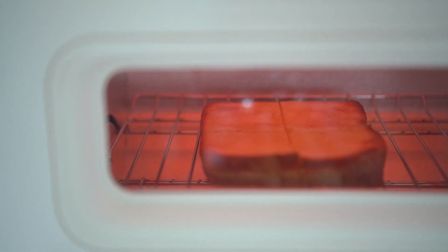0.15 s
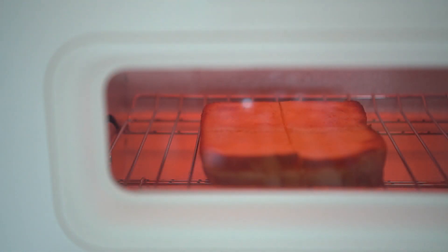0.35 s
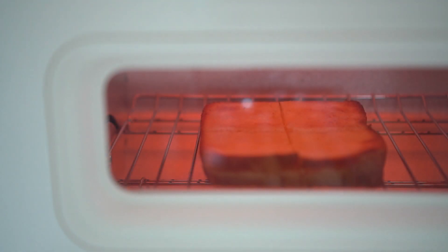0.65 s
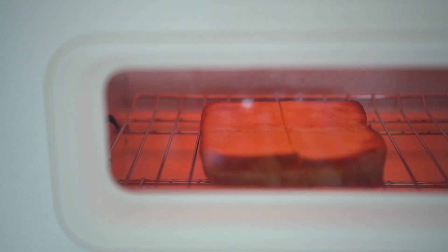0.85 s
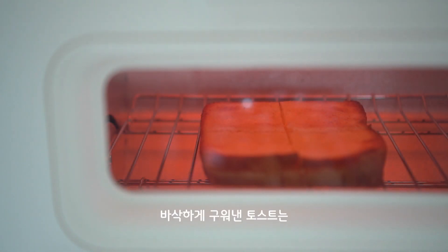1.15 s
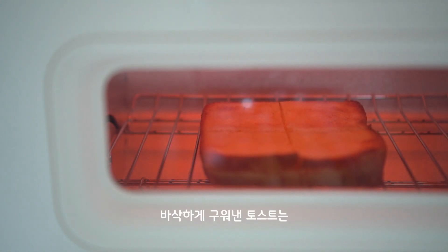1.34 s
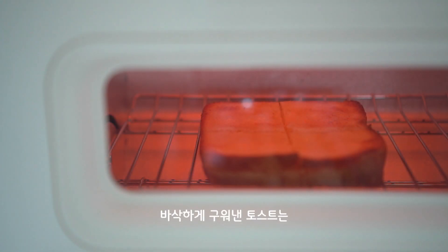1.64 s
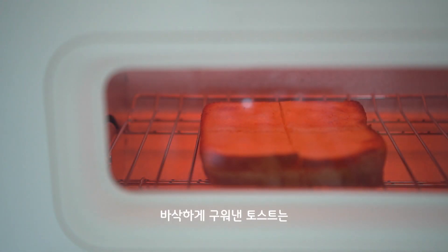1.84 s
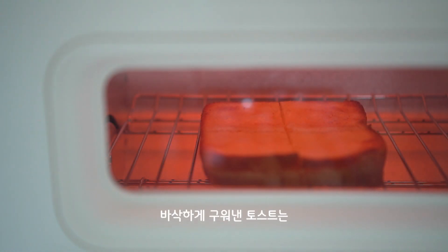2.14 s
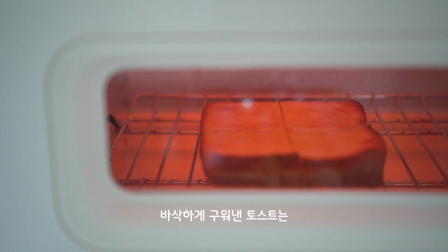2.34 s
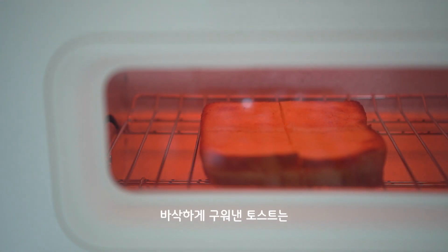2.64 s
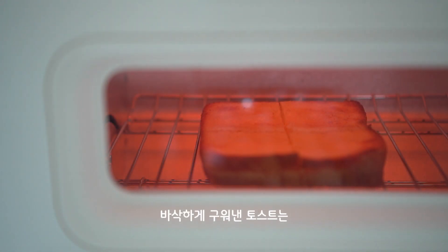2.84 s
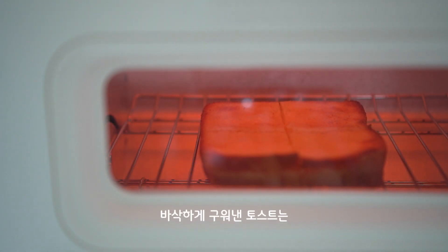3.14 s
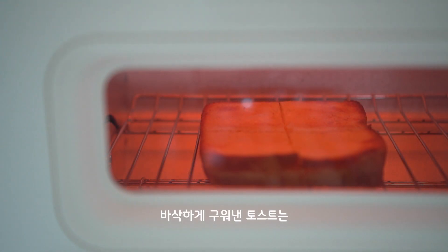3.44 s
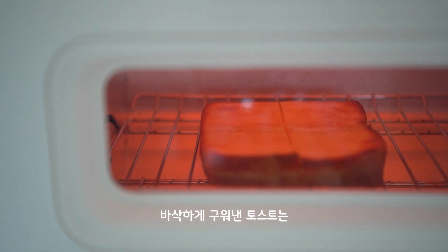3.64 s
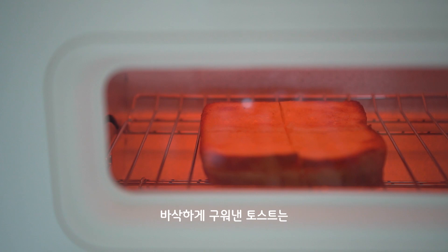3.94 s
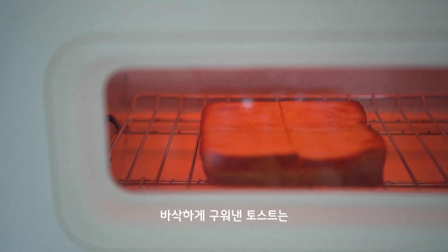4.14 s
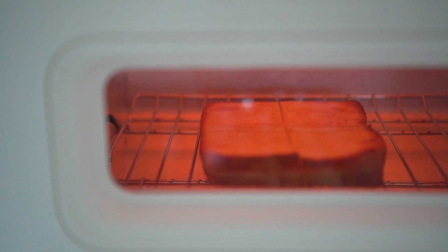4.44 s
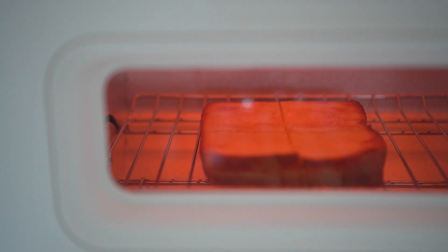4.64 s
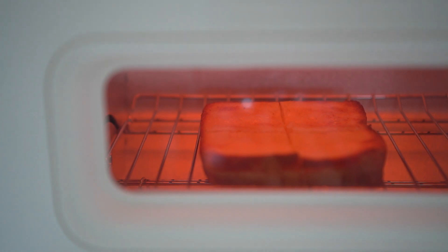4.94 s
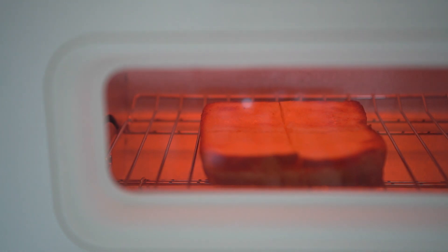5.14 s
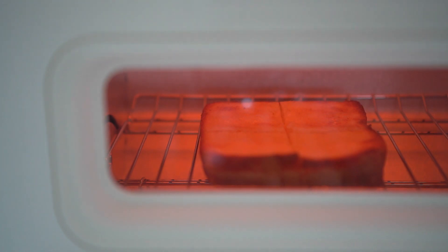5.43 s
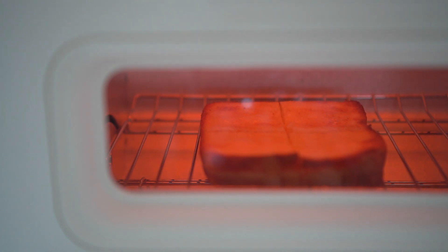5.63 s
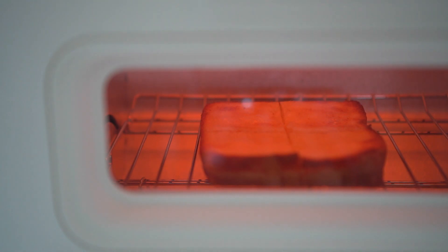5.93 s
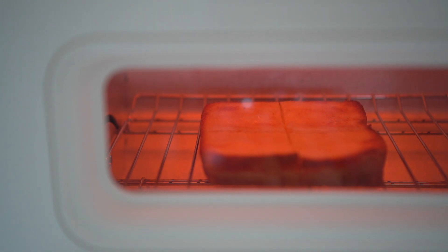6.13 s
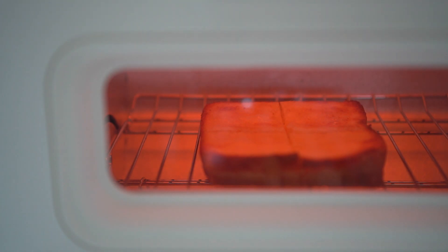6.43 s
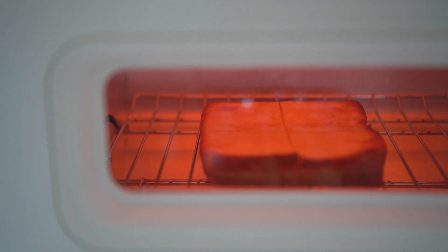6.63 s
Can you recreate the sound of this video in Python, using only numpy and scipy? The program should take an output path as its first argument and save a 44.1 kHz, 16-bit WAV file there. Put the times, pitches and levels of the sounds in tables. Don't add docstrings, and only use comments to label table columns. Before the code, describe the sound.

Bread toasts in a small oven in a quiet kitchen. Steady, dry, high-pitched timer ticks dominate from the right of a close stereo microphone. The heated shell answers slightly to the left: a pair of muted knocks, a bright rattling snap, a low knock, a duller tinny snap, then isolated knocks. Soft fan air stays far behind, and a faint floor thud comes near the end.

```python
import sys
import numpy as np
from scipy import signal
from scipy.fft import rfft, irfft, next_fast_len
from scipy.io import wavfile
from scipy.ndimage import uniform_filter1d

SR = 44100
rng = np.random.default_rng(int(sys.argv[2]) if len(sys.argv) > 2 else 0)


def file_out(sig):
    cols = np.atleast_2d(sig).T
    lim = np.clip(cols, -1, 1)
    pcm = np.round(lim * 32767).astype(np.int16)
    wavfile.write(sys.argv[1], SR, pcm)


def decibels_to_gain(level_db):
    exponent = np.asarray(level_db, float) / 20
    return 10 ** exponent


N = 298998

# (time [s], strength [dB])
TICKS = [(0.44898, 0.0), (0.9495, 0.2), (1.45002, -0.3), (1.9483, -1.5), (2.44878, 0.2), (2.94977, -0.8),
         (3.44914, -0.0), (3.94841, -0.3), (4.44986, 0.1), (4.94921, 0.3), (5.44848, -0.2), (5.94993, -0.3),
         (6.44927, 0.2)]
# (pitch [Hz], signed strength [ratio], time to fade by 60 dB [s])
CASE_TONES = [(4696, -.9, .004929), (4663, 1, .004241), (3812, -.076, .009778), (5215, -.008, .025)]
# (pitch [Hz], left level [dB], right level [dB], fade by 60 dB [s])
CASE_OVERTONES = [(5100, -42, -52, 0.031), (5400, -52, -48, .015), (6300, -54, -54, 0.0043),
                  (7860, -67, -47.5, 0.017), (8400, -57, -50.5, 0.022), (10050, -66, -47.5, 0.019),
                  (11000, -52.5, -58, 0.034)]
# (delay [s], level [dB])
LEFT_LEAK = (.00005, -17)
# (delay [s], level [dB])
LEFT_PATHS = [(.00029, -9.5), (.0006, -20), (.00128, -12.9), (.00224, -17.3), (.00396, -18.5),
              (.00621, -19)]
# (delay [s], level [dB])
RIGHT_PATHS = [(.00001, 0), (.00202, -17.9), (.0029, -15.8), (.00369, -18.4), (.00445, -13.3),
               (.00623, -17), (.007, -15.3)]
# (time [s], peak [dB], left-right [dB], chatter length [s], rattle level [dB])
SNAPS = [
    (2.8768, -22, -5, 0.01, 2.5),
    (3.8484, -20.5, -4.5, 0.016, 1),
]
# (pitch [Hz], level [dB], fade by 60 dB [s], swell [s])
PANEL_TONES = [(602, -9, 0.17, 0.013), (874, -7.5, 0.13, 0.012), (1767, -7.5, 0.11, 0.0071),
               (2250, -10, 0.07, 0.0033), (2360, -10, 0.095, 0.0073), (2560, 4.5, 0.084, 0.0056),
               (3260, -14, 0.1, .004), (3825, -0.5, 0.071, 0.0019), (4730, -11, 0.048, 0.0018),
               (5460, -10, 0.037, 0.00092), (6310, -3.5, 0.042, 0.00081), (9700, -8, 0.045, .002),
               (13370, -3, .025, .001)]
# (pitch [Hz], level [dB], fade by 60 dB [s], swell [s])
TRAY_TONES = [(214, -16.5, 0.28, 0.0043), (769, -1.5, 0.21, 0.0089), (1234, -7, 0.1, 0.0029),
              (1457, -19, 0.15, 0.0047), (1800, -19, 0.21, 0.0051), (2400, -6, 0.072, 0.0022),
              (2550, -10, 0.18, 0.0087), (3900, -7, 0.062, 0.0037), (4940, -21, .07, .006),
              (6630, -16, .05, .004), (8930, -13, 0.034, .001), (12600, -7, 0.013, .001)]
# (frequency [Hz], level [dB per Hz])
PANEL_RATTLE = [(300, -32), (700, -18), (1100, -16), (1800, 2.5), (2600, -13), (3800, -10), (6000, -3.5),
                (9500, -4), (13500, -7), (16000, -12)]
# (frequency [Hz], level [dB per Hz])
TRAY_RATTLE = [(150, -28), (450, -13), (800, -2), (1400, -1.5), (2500, -6), (4000, -7), (8000, -14.5),
               (12600, -19), (16000, -24)]
# (time [s], peak [dB], left-right [dB], main pitch [Hz], cluster level [dB])
KNOCKS = [
    (2.0159, -36, -3, 730, -16.5),
    (2.0873, -35.5, -2, 790, -16.5),
    (3.194, -33.5, -1.5, 680, -17),
    (4.448, -32.5, -3, 688, -13.5),
    (5.9732, -30, -3, 725, -12),
]
# (frequency [Hz], level [dB per Hz])
KNOCK_BODY = [(120, -27), (300, -12), (450, -5.5), (750, 0), (1050, -2), (1450, -12), (2350, -12.5),
              (3200, -24), (6000, -37)]
# (frequency [Hz], fade by 60 dB [s])
KITCHEN_FADE = [(200, 0.36), (1000, 0.47), (4000, 0.39), (12000, 0.15)]
# (time [s], level [dB])
THUD = (6.325, -50)
# (pitch [Hz], level [dB], fade by 60 dB [s])
FLOOR_TONES = [(76, -14, .3), (111.6, -11, .3), (276, 4, 0.2), (660, -1, 0.11)]
# (frequency [Hz], level [dB per Hz])
AIR_COLOUR = [(25, -48), (50, -48), (90, -24), (130, -16.5), (200, -12.5), (290, -7), (800, -7.5),
              (1130, -4.5), (2100, -12), (3000, -12), (3700, -16), (8000, -20.5), (13000, -23),
              (16000, -24.5)]
# (frequency [Hz], likeness [-1 to 1])
AIR_LIKENESS = [(60, 1), (270, 0.85), (450, 0.58), (740, 0.1), (1220, 0.54), (2010, -0.32), (3330, 0.23),
                (15000, .25)]
# (frequency [Hz], left over right [dB])
AIR_LEAN = [(60, 0), (380, 1), (700, 0), (1290, 3.5), (2380, -1.5), (4400, -2.5), (15000, -2.7)]
# (frequency [Hz], width [Hz], boost [dB])
DUCT = [(278, 7.4, 7), (376, 4.4, 12), (665, 10.5, 7), (977, 44, 3.5), (1124, 30, 5), (1160, 115, 3.5),
        (1418, 36, 6), (2934, 94, 4.5)]
# (pitch [Hz], level [dB])
HUM_TONES = [(59.02, -93), (59.384, -95)]


def unit(x):
    return x / np.sqrt(np.mean(x ** 2) + 1e-20)


def along(points, hz):
    f, v = np.transpose(points)
    return np.interp(np.log(hz + 1), np.log(f + 1), v)


def filtered(x, response):
    size = next_fast_len(x.shape[-1] + 8192)
    spectrum = rfft(x, size) * response(np.fft.rfftfreq(size, 1 / SR))
    return irfft(spectrum, size)[..., :x.shape[-1]]


def ring(t, hz, db, t60):
    return decibels_to_gain(db - 60 * t / t60) * np.sin(2 * np.pi * hz * t)


def swelling(t, swell_s):
    return 1 - np.exp(-(t / swell_s) ** 2)


def add(out, s, x):
    k = round(s * SR)
    part = out[:, max(k, 0):][:, :x.shape[-1] + min(k, 0)]
    part += x[:, max(-k, 0):][:, :part.shape[-1]]


def placed(x, pan_db, wet_db, gap):
    hz, t, z = signal.stft(rng.standard_normal((2, SR // 2)), SR, nperseg=128)
    fade = decibels_to_gain(-60 * t / along(KITCHEN_FADE, hz)[:, None])
    tail = signal.istft(z * fade, SR, nperseg=128)[1][:, :SR // 2]
    u = np.arange(SR // 2) / SR
    tail = tail * swelling(u, gap) * (1 + 0.44 * np.exp(-u / 0.013))
    tail = tail / np.linalg.norm(tail[0])
    wet = signal.fftconvolve(x, tail, axes=1)[:, :x.shape[-1]]
    direct = x * decibels_to_gain(np.array([[pan_db / 2], [-pan_db / 2]]))
    return direct + decibels_to_gain(wet_db) * wet


def clutter(count):
    start_s, step_s = 0.008, 0.0025
    level_db, fade_db_per_s = -24.5, -60
    chance = rng.random((count, 2))
    delay = start_s + step_s * (np.arange(count) + chance[:, 0])
    level = level_db + fade_db_per_s * delay + 3 * (chance[:, 1] - .5)
    return list(zip(delay, level))


def case_click(t):
    return sum(gain * ring(np.maximum(t, 0), hz, 0, t60) for hz, gain, t60 in CASE_TONES)


def timer():
    t = np.arange(SR // 2) / SR
    left = [LEFT_LEAK, *LEFT_PATHS, *clutter(count=5)]
    right = [*RIGHT_PATHS, *clutter(count=5)]
    tick = np.array([sum(decibels_to_gain(db) * case_click(t - delay) for delay, db in paths) for paths in (left, right)])
    overtones = sum(ring(t, hz, np.array([[left_db], [right_db]]), t60)
                    for hz, left_db, right_db, t60 in CASE_OVERTONES)
    tick = tick + overtones * (1 - np.exp(-t / 0.00044))
    toward_walls = (case_click(t) + ring(t, 5050, -28, .007) + ring(t, 3812, -27, .0098))[None]
    tick = tick + placed(toward_walls, 0, -11, gap=.009) - toward_walls
    edge_hz = np.array([[3550], [3150]])
    tick = filtered(tick, lambda hz: 1 / np.sqrt(1 + (edge_hz / (hz + 1)) ** 14))
    out = np.zeros((2, N))
    earlier = (TICKS[0][0] - .5, 0)
    for s, db in [earlier] + list(TICKS):
        add(out, s, decibels_to_gain(db + 0.5) * tick)
    return out


def burst(t, colour, rise, length):
    noise = rng.standard_normal((3, len(t)))
    shared = noise[0] + noise[1:]
    hiss = unit(filtered(shared, lambda hz: decibels_to_gain(along(colour, hz))))
    return hiss * (1 - np.exp(-t / rise)) * np.exp(-(t / length) ** 1.2)


def shell():
    out, t = np.zeros((2, N)), np.arange(SR // 2) / SR
    parts = [(PANEL_TONES, PANEL_RATTLE), (TRAY_TONES, TRAY_RATTLE)]
    for (s, db, pan, chatter, rattle_db), (modes, colour) in zip(SNAPS, parts):
        tones = np.zeros((2, len(t)))
        for hz, level, t60, swell in modes:
            flutter = uniform_filter1d(rng.standard_normal((3, len(t))), size=180, axis=1)
            flutter = unit(flutter[0] + 0.52 * flutter[1:])
            uneven_t = t + 0.56 * flutter / (2 * np.pi * hz)
            tones += ring(uneven_t, hz, level, t60) * swelling(t, swell)
        rattle = decibels_to_gain(rattle_db) * burst(t, colour, 0.0092, chatter)
        add(out, s, decibels_to_gain(db - 6.5) * placed(tones + rattle, pan, -6, gap=0.0055))
    return out


def knocks():
    slow_db = -11
    out, t = np.zeros((2, N)), np.arange(SR // 2) / SR
    for s, db, pan, hz, cluster_db in KNOCKS:
        main = ring(t, hz, 0, .022) * swelling(t, .003)
        slow = ring(t, 320, slow_db, 0.088) + ring(t, 1018, slow_db, 0.071)
        cluster = decibels_to_gain(cluster_db) * burst(t, KNOCK_BODY, 0.0075, 0.02)
        body = main + slow * swelling(t, 0.013) + cluster
        add(out, s - .002, decibels_to_gain(db + 7) * placed(body, pan, -5, gap=.008))
    return out


def thud():
    out, t = np.zeros((2, N)), np.arange(SR // 2) / SR
    s, db = THUD
    floor = sum(ring(t, hz, level, t60) for hz, level, t60 in FLOOR_TONES)[None]
    add(out, s, decibels_to_gain(db) * floor * swelling(t, 0.028))
    return out


def air():
    fan_db = -53.5
    z = signal.stft(rng.standard_normal((2, N)), nperseg=512)[2]
    patches = uniform_filter1d(rng.standard_normal(z.shape[1:]), size=5, axis=0)
    patches = uniform_filter1d(patches, size=14, axis=1)
    pair = signal.istft(z * decibels_to_gain(0.51 * unit(patches)), nperseg=512)[1][:, :N]

    def duct(hz):
        return sum(db / (1 + (2 * (hz - centre) / width) ** 2) for centre, width, db in DUCT)

    def spread(hz):
        turn = np.arccos(np.clip(along(AIR_LIKENESS, hz), -1, 1)) / 2
        return decibels_to_gain(along(AIR_COLOUR, hz) + duct(hz)) * [np.cos(turn), np.sin(turn)]

    mid, side = filtered(pair, spread)
    sides = np.array([mid + side, mid - side])
    sides = filtered(sides, lambda hz: decibels_to_gain(np.outer([.5, -.5], along(AIR_LEAN, hz))))
    return decibels_to_gain(fan_db + 3) * unit(sides)


def hum():
    in_step_s = 3.37
    t = np.arange(N) / SR - in_step_s
    return sum(np.sqrt(2) * decibels_to_gain(db) * np.sin(2 * np.pi * hz * t) for hz, db in HUM_TONES)


def scene():
    def no_deep_bass(hz):
        return (1j * hz / (1j * hz + 110)) ** 3

    oven = filtered(shell() + knocks(), no_deep_bass)
    return timer() + oven + thud() + air() + hum()


def band_limit(x):
    return signal.sosfilt(signal.butter(12, 15700, fs=SR, output="sos"), x)


def record(dry):
    mix = filtered(dry, lambda hz: hz < 15960)
    return band_limit(mix)


dry = scene()
out = record(dry)
file_out(out)
```